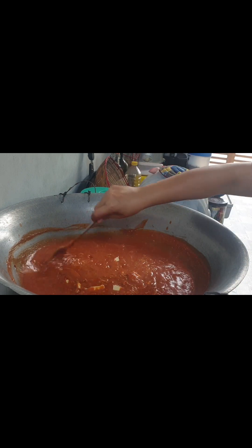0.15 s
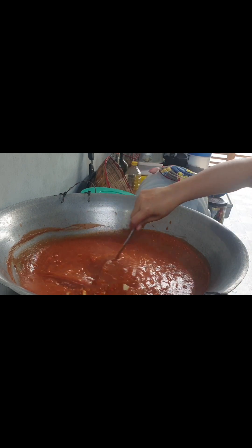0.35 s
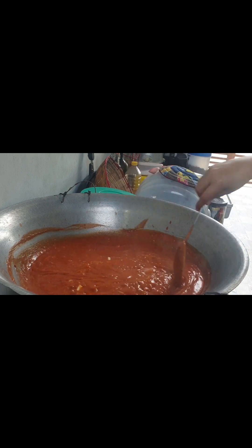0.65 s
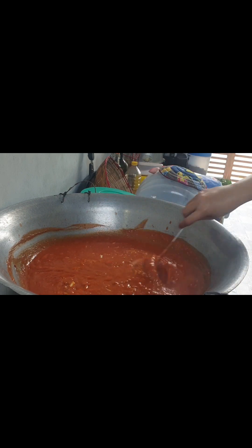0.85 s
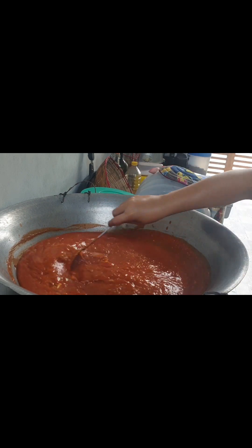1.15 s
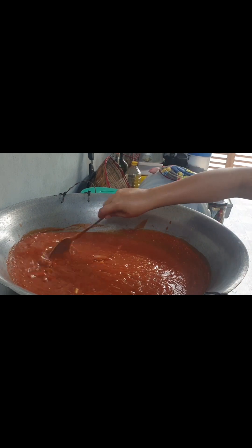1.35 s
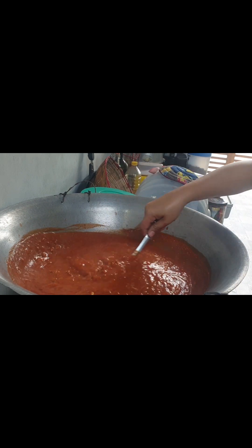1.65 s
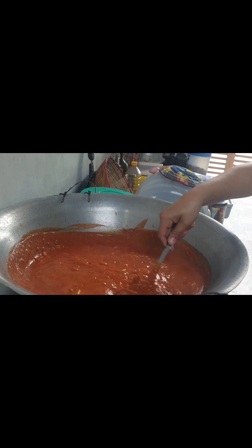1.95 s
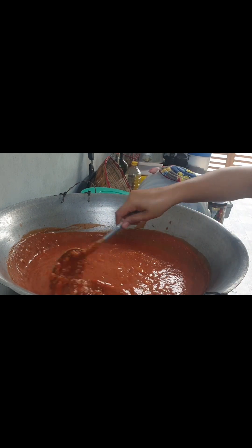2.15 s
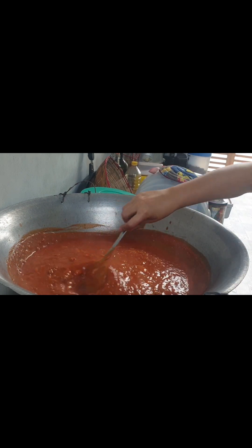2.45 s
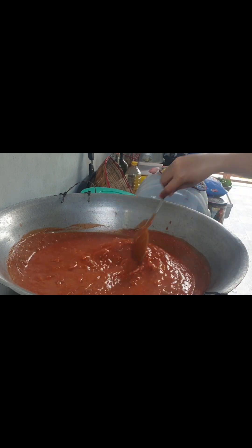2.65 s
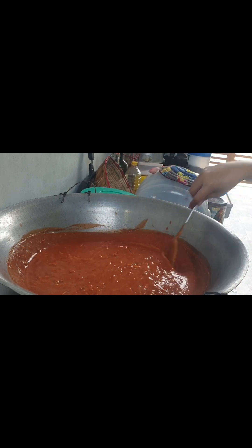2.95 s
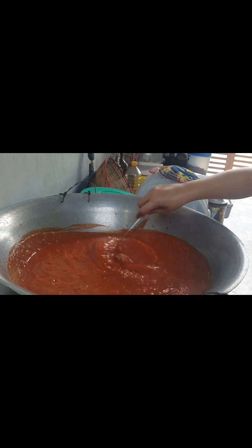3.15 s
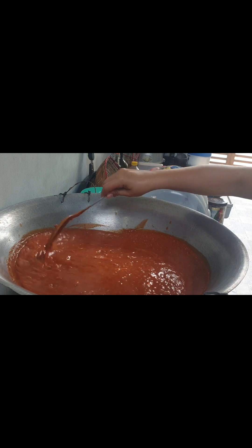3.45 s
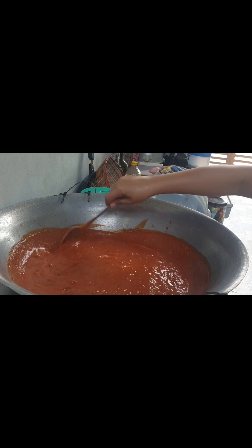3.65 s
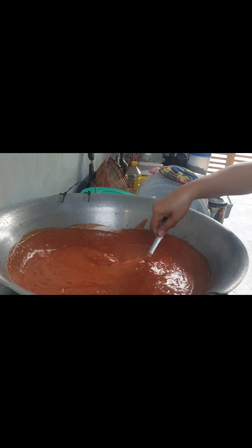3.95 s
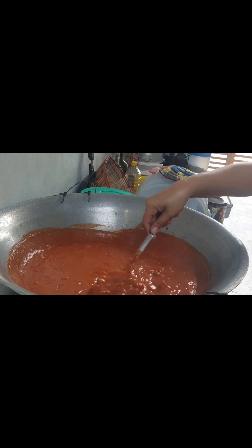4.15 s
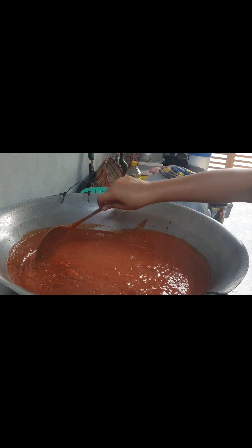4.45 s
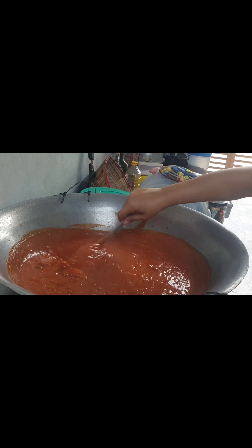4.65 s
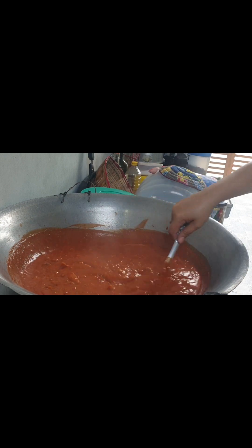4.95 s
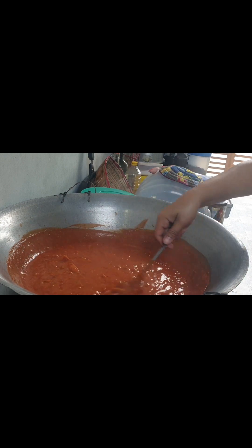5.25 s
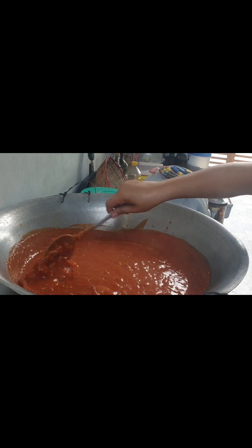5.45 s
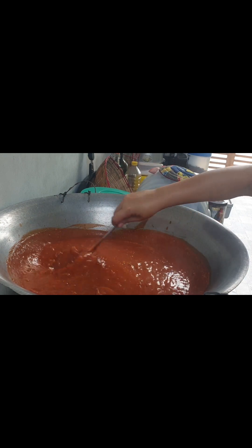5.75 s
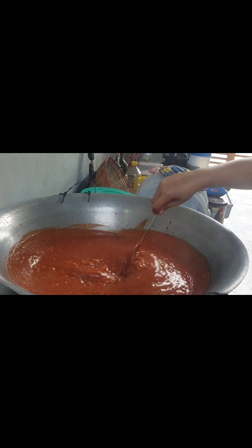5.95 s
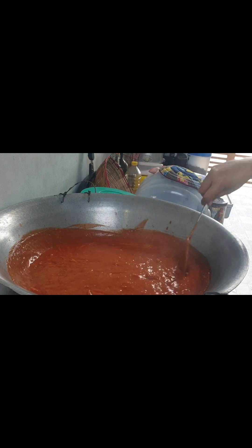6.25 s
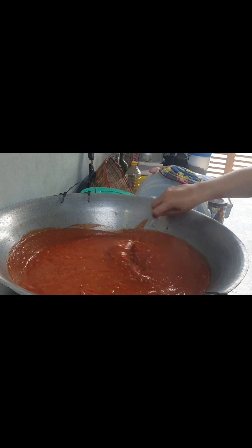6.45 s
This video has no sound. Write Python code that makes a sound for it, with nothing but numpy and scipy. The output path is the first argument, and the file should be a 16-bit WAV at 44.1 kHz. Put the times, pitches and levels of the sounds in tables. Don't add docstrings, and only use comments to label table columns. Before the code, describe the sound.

Close, gritty metal scraping and dull clanks as a spoon stirs heavy sauce in a big metal wok, with soft room hum and distant birds.

```python
import sys
import numpy as np
from scipy import signal
from scipy.fft import rfft, irfft, next_fast_len
from scipy.io import wavfile

SR = 44100
rng = np.random.default_rng(int(sys.argv[2]) if len(sys.argv) > 2 else 0)


def generate_wav(sig):
    pcm = np.round(np.clip(np.atleast_2d(sig).T, -1, 1) * 32767).astype(np.int16)
    wavfile.write(sys.argv[1], SR, pcm)


def volts_from_db(level):
    exponent = np.asarray(level, float) / 20
    return 10 ** exponent


N = 291060

# pitch_hz, left_minus_right_db
LEAN = [(60, 1.5), (200, 3.5), (400, 2), (800, 1.5), (1500, 6), (3000, 3.5), (5000, 2.5), (9000, 4),
        (15000, 6)]
HISS_DB, HISS_PER_RING, HISS_PER_THUD = -12.5, -0.28, 0.26


def rms_one(x):
    return x / np.sqrt(np.mean(x ** 2) + 1e-20)


def at_hz(points, hz):
    table_hz, values = np.array(points)[:, 0], np.array(points)[:, 1]
    return np.interp(np.log(hz + 1), np.log(table_hz), values)


def in_time(rows):
    s, *columns = np.transpose(rows)
    return np.array([np.interp(np.arange(N) / SR, s, column) for column in columns])


def drift(rate_hz):
    r = np.exp(-80 * np.pi * rate_hz / SR)
    draws = rng.standard_normal(N // 40 + 2002)
    slow = signal.lfilter([1], [1, -2 * r, r * r], draws)[2000:]
    return np.interp(np.arange(N) / 40, np.arange(len(slow)), rms_one(slow))


def stereo_noise(spectrum, likeness, size):
    hz = np.fft.rfftfreq(size, 1 / SR)
    mid, side = rfft(rng.standard_normal((2, size)))
    alike = np.clip(at_hz(likeness, hz), -1, 1)
    pair = np.sqrt(1 + alike) * mid + np.sqrt(1 - alike) * side * [[1], [-1]]
    level_db = at_hz(spectrum, hz) + at_hz(LEAN, hz) / 2 * [[1], [-1]]
    return irfft(pair * volts_from_db(level_db), size)


def whistle(hz, width_hz):
    r = np.exp(-np.pi * width_hz / SR)
    draws = rng.standard_normal((2, len(hz) + 4000))
    wander = signal.lfilter([1], [1, -2 * r, r * r], draws)[:, 4000:]
    turn = 2 * np.pi * np.cumsum(hz) / SR
    return rms_one(wander[0] * np.sin(turn) + wander[1] * np.cos(turn))


def kitchen():
    # pitch_hz, level_db per Hz
    air = [(15, -61), (25, -2), (56, 0), (102, 5), (180, -5.5), (223, -5), (326, -11), (384, -9),
           (1370, -22), (2050, -24.5), (4370, -19.5), (7510, -46.5), (11000, -36.5), (14000, -39.5),
           (16000, -63.5)]
    # pitch_hz, left-right likeness (-1 to 1)
    air_likeness = [(60, 1), (130, 0.93), (290, 0.77), (640, 0.59), (1410, 0.22), (3100, -0.66), (6820, 1),
                    (15000, -0.55)]
    # time_s, level_db
    swell = [(0.0, -57), (0.05, -49.5), (0.42, -50.5), (0.62, -47), (0.77, -53), (0.99, -52), (1.08, -43),
             (1.17, -49.5), (1.54, -52), (2.41, -48.5), (2.68, -52.5), (3.66, -52.5), (3.84, -49.5),
             (4.7, -53.5), (4.94, -50.5), (5.35, -55.5), (5.68, -50.5), (6.6, -48.5)]
    # pitch_hz, width_hz, level_db against the rumble
    resonances = [(43.9, 28, -11), (75.2, 7.4, -5.5), (118.5, 33, -6.5), (177.7, 4.8, -10.5)]
    # time_s, pitch_hz, level_db
    fading_hum = [
        (0, 107.4, -38),
        (.2, 107.6, -40.5),
        (.33, 113.5, -43.5),
        (.42, 117, -69),
    ]
    noise = stereo_noise(air, air_likeness, N)
    high = rms_one(signal.sosfilt(signal.butter(3, 200, "high", fs=SR, output="sos"), noise))
    low = rms_one(signal.sosfilt(signal.butter(3, 200, "low", fs=SR, output="sos"), noise))
    drone = sum(volts_from_db(level_db) * whistle(np.full(N, hz), width) for hz, width, level_db in resonances)
    lean = volts_from_db([[1.3], [-1.3]])
    rumble = volts_from_db(in_time(swell)) * (volts_from_db(-1.0) * low + drone * lean)
    hum_hz, hum_db = in_time(fading_hum + [(3.3, 38, -120)])
    hum_turn = 2 * np.pi * np.cumsum(hum_hz + 4.5 * drift(4.2)) / SR
    hum = volts_from_db(hum_db + 0.87 * drift(25)) * np.sin(hum_turn)
    air_db = -61 + 5.0 + drift(3.2)
    return volts_from_db(air_db) * high + rumble + hum * lean


def birds():
    # start_s, length_s, pitch_hz, width_hz, level_db
    calls = [(0, 0.078, 725, 40, -54), (0.051, 0.24, 4530, 120, -63), (.62, .04, 4200, 150, -72),
             (0.718, 0.12, 3170, 400, -60), (.72, .04, 3850, 200, -60), (1.847, .1, 4930, 300, -49.5),
             (1.858, .09, 2930, 600, -53), (1.868, 0.076, 1450, 400, -54), (5.406, 0.049, 3550, 280, -54),
             (5.447, 0.12, 4130, 120, -68), (6.113, 0.07, 5750, 130, -62)]
    out, t = np.zeros((2, N)), np.arange(SR // 4) / SR
    for s, length, hz, width, level_db in calls:
        shape = np.interp(t, [0, .008, length, length + .02], [0, 1, .4, 0])
        pitch, at = np.full(len(t), hz), int(s * SR)
        pair = np.array([whistle(pitch, width), whistle(pitch, width)])
        out[:, at:at + len(t)] += volts_from_db(level_db) * shape * pair
    return out


def landings(blow_db=2.0, skid_s=0.0013):
    # start_s, rasp_peak_db, then thud_db, bowl_ring_db and hiss_db against the rasp
    touches = [(0.1862, -29, 7, 6, -3), (0.8114, -14.5, -2.5, -48, -4), (1.118, -45.5, 2.5, 19, -16),
               (1.1423, -33, -3, 0, -15), (2.049, -54, 4, 16, -10.5), (2.409, -41, 20.5, 19, -14),
               (2.785, -54, -6, 13, -25.5), (3.0318, -23.5, 5, 6, -10), (3.2862, -48.5, -10, 18, -28),
               (3.695, -23.5, 3, 0, -3.5), (3.9569, -45, 3, 8.5, 3), (4.605, -29.5, 8.5, 4.5, -10.5),
               (5.5782, -65, -10.5, -10, 2), (5.674, -31, 0, -4, -1.5), (5.9024, -31, -7, -5, -13),
               (6.3314, -22, -4.5, 0.5, -6.5)]
    out, t = np.zeros((4, N + 2000)), np.arange(2000) / SR
    for s, peak_db, thud, ring, hiss in touches:
        skid = rng.standard_normal(2000) * np.exp(-t / skid_s)
        colour_db = np.array([[thud], [ring], [0], [hiss]])
        at = int(s * SR)
        out[:, at:at + 2000] += volts_from_db(peak_db + blow_db + colour_db) * skid
    return out[:, :N]


def grit(per_s=12000, spread_db=2):
    sizes = volts_from_db(spread_db * np.minimum(rng.exponential(1, N), 5)) * rng.choice([-1, 1], N)
    clicks = sizes * (rng.random(N) < per_s / SR)
    return rms_one(clicks * volts_from_db(drift(60) + .4 * drift(15)))


def drag():
    # start_s, fade_s, rasp_db, then thud_db and bowl_ring_db against the rasp
    slides = [(.1863, 0.19, -41, 1.5, -3.5), (.8118, 0.31, -36, -2.5, -6), (1.1429, 0.14, -43, -1.5, 6),
              (1.845, 0.18, -52, -3, -2), (2.048, 0.2, -56.5, 13.5, 6), (2.408, 0.15, -43, 6, 5),
              (2.784, 0.18, -54.5, 14.5, 9), (3.0323, 0.26, -35, -5, -2), (3.2866, 0.13, -51, -6, 7.5),
              (3.695, 0.28, -40.5, -3.5, -4.5), (3.9578, 0.075, -61.5, 7, -1),
              (4.6063, .12, -47, 4.5, -4.5), (5.674, 0.19, -45, 5.5, 1), (6.218, .3, -57, 4.5, 2),
              (6.3301, 0.13, -37, -5, -2.5)]
    # crest_s, fade_s,
    # rasp_db, then thud_db and bowl_ring_db against the rasp
    pushes = [(.278, 0.11, -36.5, -1.5, -1.5), (.945, 0.18, -36, -9.5, 2), (1.185, 0.16, -41.5, -6.5, 5.5),
              (1.28, 0.12, -52, 6, 3), (1.51, 0.2, -44, -1, -1.5), (1.69, 0.19, -57.5, 6, 7.5),
              (1.92, 0.074, -50.5, -6, -10), (2.51, 0.12, -44.5, 3.5, 5.5), (2.75, .1, -58, 6.5, -2),
              (3.135, 0.067, -37.5, -21, 7), (3.195, .07, -40.5, -6, 7.5), (3.235, 0.043, -39.5, -6.5, 8.5),
              (3.325, 0.03, -50, 2, 9), (3.8, 0.22, -48.5, -3.5, -18), (3.89, 0.087, -53.5, -9, 2),
              (4.725, 0.065, -43.5, 2, 5), (4.765, 0.05, -47.5, 0, -9), (4.88, 0.24, -54, 4.5, 4),
              (5.02, 0.16, -45.5, -9, -6), (5.1, 0.11, -46, -9, -7), (5.79, 0.18, -39.5, 3, 0.5),
              (5.87, 0.097, -42, -6, 1), (6.445, 0.13, -36.5, -5.5, -2.5), (6.535, 0.11, -36, -7, 5),
              (0.468, 0.1, -58.5, 4, -3), (.52, 0.15, -66, 9.5, 2), (2.337, 0.16, -66, 13.5, 8.5),
               (4.13, 0.093, -65.5, 3, 7), (4.23, 0.018, -73, -8, -15), (2.22, .15, -64.5, 7.5, 2),
               (4.32, 0.044, -74, 16.5, 13), (4.885, 0.027, -56, -3, -15), (4.5, 0.038, -82, 8, -2),
               (5.19, 0.085, -57, -9, -9), (5.47, 0.22, -68, -12, -10), (5.502, 0.021, -59, -7, -17),
               (5.583, 0.03, -55, -19, -8)]
    # level_db of thud, ring, rasp, hiss
    resting_db = [-65.5, -81, -67, -77.5]
    bite_s, rise_share, roundness = 0.0035, 0.66, 1.494
    t = np.arange(0, N + 40, 40) / SR
    power = volts_from_db(resting_db)[:, None] ** 2
    for rows, sudden in ((slides, True), (pushes, False)):
        for s, fade, rasp_db, thud, ring in rows:
            rise = bite_s if sudden else rise_share * fade
            crest = s + sudden * bite_s
            away = np.abs(t - crest) / np.where(t < crest, rise, fade)
            shape_db = -20 * away ** roundness
            hiss = HISS_DB + HISS_PER_RING * ring + HISS_PER_THUD * thud
            colour_db = np.array([[thud], [ring], [0], [hiss]])
            power = power + volts_from_db(np.maximum(rasp_db + colour_db + shape_db, -200)) ** 2
    return in_time(np.vstack([t, np.sqrt(power)]).T)


def bite(levels):
    # tilt_db, slope in dB per dB
    tilts = [
        (7.5, .9),
        (11, -0.07),
        (-2, 0.65),
    ]
    # time_s, tilt_db
    up_the_wall = [(0, -15), (.3, 4), (.85, -9), (1.2, -1), (1.6, 26), (2.1, -2), (2.48, 30), (2.81, 8),
                   (3.1, -8), (3.3, -2), (3.8, 15), (4.6, -2), (4.79, -1), (5.0, 21), (5.7, -5), (6.25, -9),
                   (6.44, -3), (6.6, -1)]
    wall_shares = [0.13, 0.7, 0.1]
    thud, ring, rasp, hiss = 20 * np.log10(levels)
    steps = [ring - rasp, rasp - thud, hiss - HISS_DB - ring]
    (wall,) = in_time(up_the_wall)
    return [tilt + slope * step + share * wall
            for (tilt, slope), step, share in zip(tilts, steps, wall_shares)]


def wok_ring(thicket_t60=.035, room_db=-22, room_t60=.35):
    # pitch_hz, width_hz, level_db
    wok_modes = [(255.8, 5.4, -16.5), (300, 92, 1.5), (410, 34, -1.5), (419, 85, 8), (500, 52, 0),
                 (718, 53, -3), (773, 200, -17), (930, 190, 5.5), (909.6, 69, -28), (970, 34, -4),
                 (1020.5, 6.9, -3.5), (1056, 27, 12.5), (970, 25, 23), (1180, 148, 1.5), (1282, 37, -3.5),
                 (1340, 88, -11), (1440, 200, -2), (1630, 57, 2.5), (1870, 12.5, -10), (2008, 26, -2.5),
                 (2370, 290, -21), (2274, 140, -1), (3030, 74, -9.5), (2800, 10, -27), (3047, 19, -6.5),
                 (3430, 120, -25), (4130, 140, -46), (4990, 24, 0)]
    # pitch_hz, level_db per Hz
    thicket = [(88, -43), (150, 16.5), (201, -20), (259, 7.5), (368, -4), (422, -2), (662, -0.5),
               (871, 15.5), (1020, 6.5), (1420, -13), (3770, -2.5), (7770, -18), (11300, -14.5),
               (14800, -16), (16000, -60)]
    # pitch_hz, left-right likeness (0 to 1)
    wok_likeness = [(60, .995), (300, .99), (700, .95), (1000, .75), (1400, .08), (2500, .04), (15000, .01)]
    right_lag = 9
    t = np.arange(SR // 5) / SR
    hz, width, level_db = np.array(wok_modes).T[:, :, None]
    strength = volts_from_db(level_db + 3 * rng.standard_normal(hz.shape)) * rng.choice([-1, 1], hz.shape)
    turn = np.sqrt(-2 * np.log(at_hz(wok_likeness, hz))) * rng.standard_normal(hz.shape)
    lean = volts_from_db(at_hz(LEAN, hz) / 2)
    fading = strength * np.exp(-np.pi * width * t)
    left = np.sum(fading * lean * np.sin(2 * np.pi * hz * t), axis=0)
    right = np.sum(fading / lean * np.sin(2 * np.pi * hz * t + turn), axis=0)
    tail = volts_from_db(-60 * t / thicket_t60) + volts_from_db(room_db - 60 * t / room_t60)
    dense = rms_one(stereo_noise(thicket, wok_likeness, len(t)) * tail)
    left, right = rms_one(np.array([left, right])) + volts_from_db(4) * dense
    return np.array([np.pad(left, (0, right_lag)), np.pad(right, (right_lag, 0))])


def spoon(count=12):
    region_edges = [190, 350, 680, 1080, 1500, 2700, 6200, 15600]
    levels = drag()
    thud, ring, rasp, hiss = levels * grit() + landings()
    drives = []
    for part, tilt in zip([thud, ring, rasp], bite(levels)):
        both_halves = np.hypot(volts_from_db(tilt / 2), volts_from_db(-tilt / 2))
        for side in (-1, 1):
            drives.append(part * volts_from_db(side * tilt / 2) / both_halves)
    drives.append(hiss)

    rings, force = np.array([wok_ring() for spot in range(count)]), 0
    for drive, low, high in zip(drives, region_edges, region_edges[1:]):
        region = signal.butter(2, [low, high], "band", fs=SR, output="sos")
        answer = np.sqrt(np.sum(signal.sosfilt(region, rings.mean(axis=1)) ** 2) / count)
        force = signal.sosfilt(region, drive) / answer - force

    share = np.array([drift(15) for spot in range(count)])
    share = share / np.sqrt(np.sum(share ** 2, axis=0))
    size = next_fast_len(N + SR // 2)
    touched = rfft(rings, size) * rfft(force * share, size)[:, None]
    return irfft(np.sum(touched, axis=0), size)[:, :N]


def scene():
    return spoon() + kitchen() + birds()


def top_cut(x):
    return signal.sosfilt(signal.butter(12, 16620, fs=SR, output="sos"), x)


def record(dry):
    wet = signal.sosfilt(signal.butter(3, [42, 15500], "band", fs=SR, output="sos"), dry)
    return top_cut(wet)


dry = scene()
out = record(dry)
generate_wav(out)
```